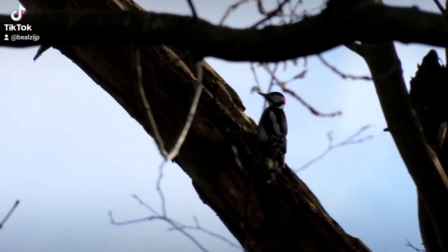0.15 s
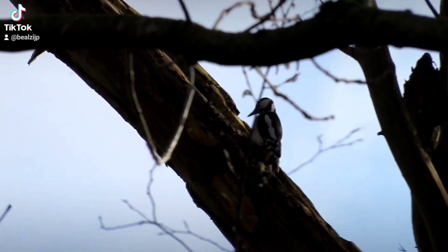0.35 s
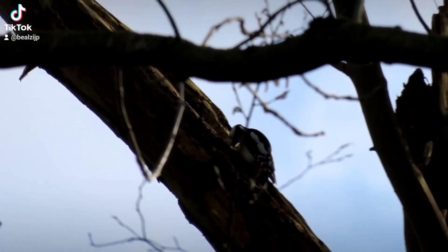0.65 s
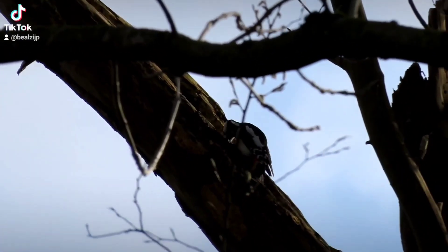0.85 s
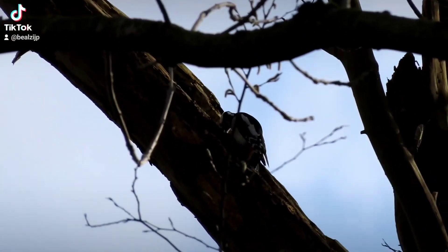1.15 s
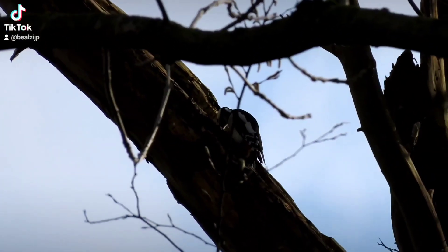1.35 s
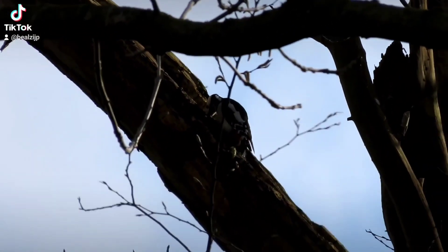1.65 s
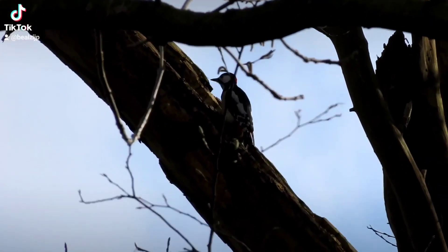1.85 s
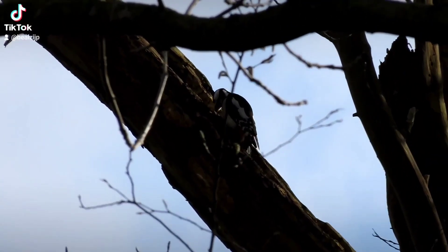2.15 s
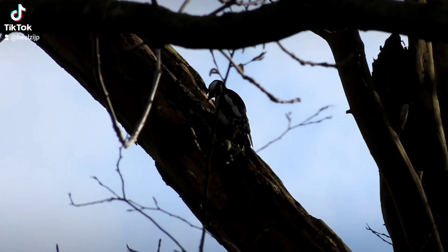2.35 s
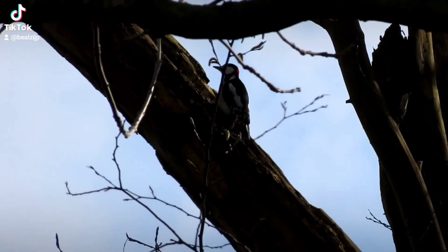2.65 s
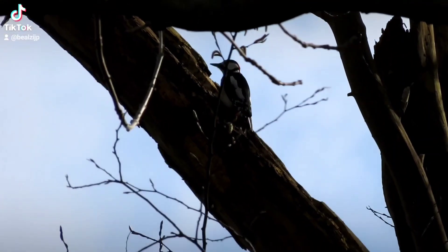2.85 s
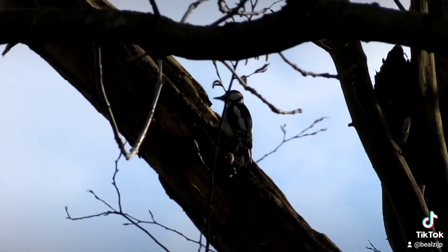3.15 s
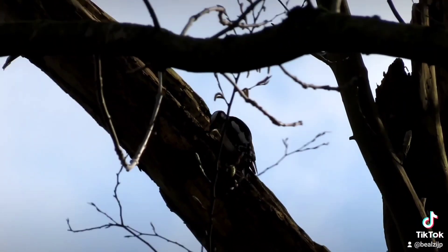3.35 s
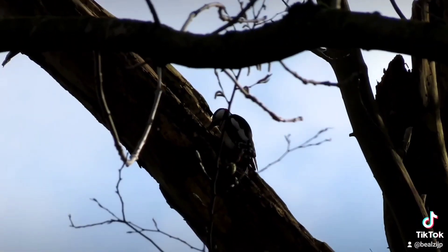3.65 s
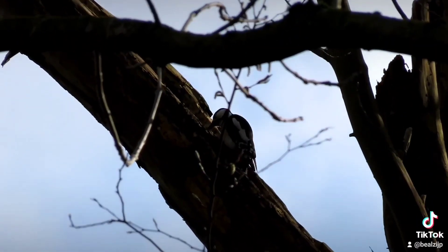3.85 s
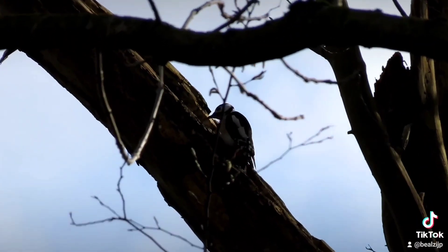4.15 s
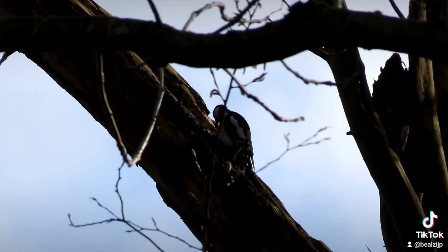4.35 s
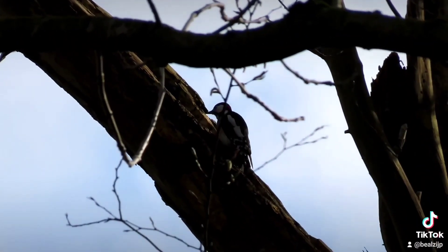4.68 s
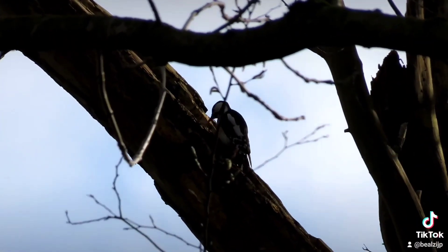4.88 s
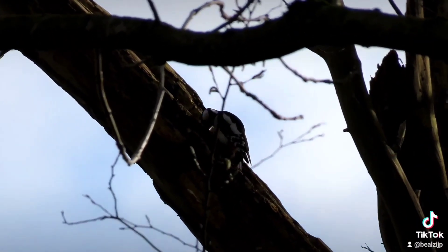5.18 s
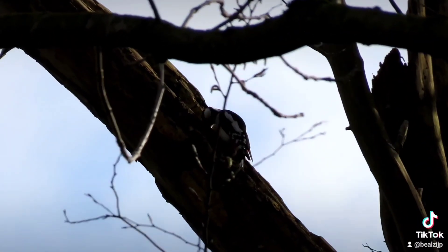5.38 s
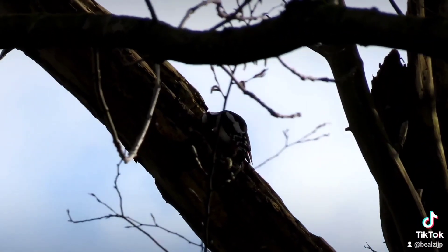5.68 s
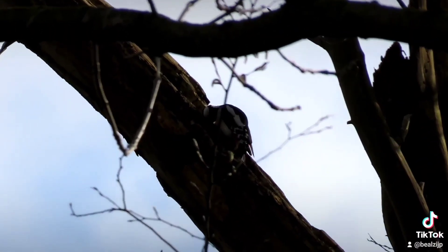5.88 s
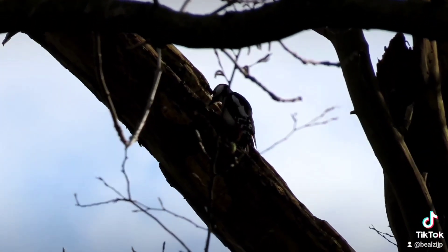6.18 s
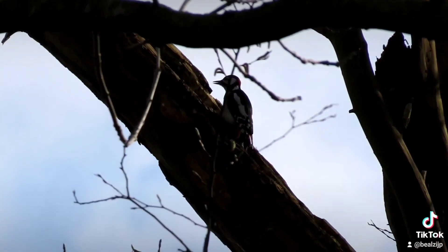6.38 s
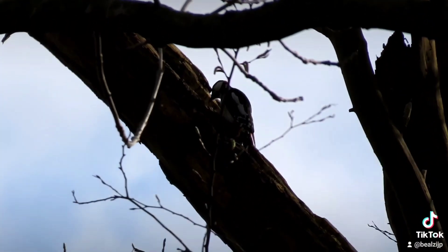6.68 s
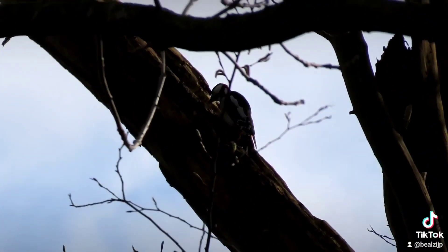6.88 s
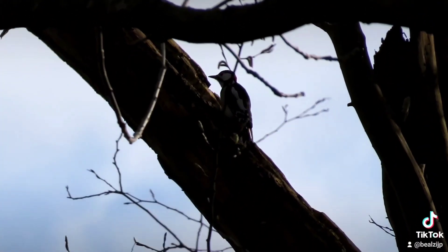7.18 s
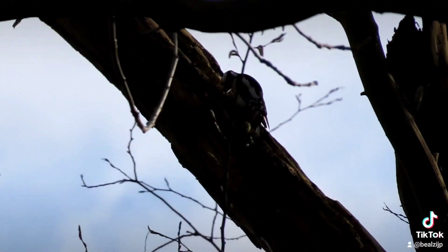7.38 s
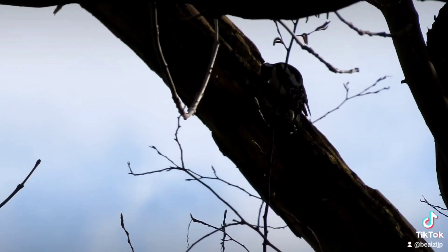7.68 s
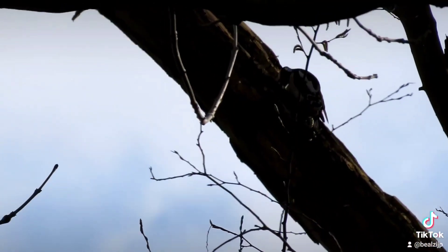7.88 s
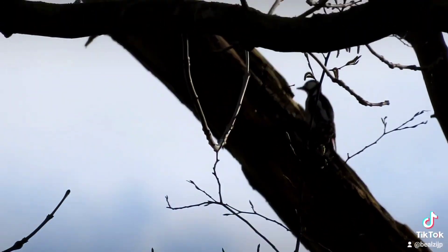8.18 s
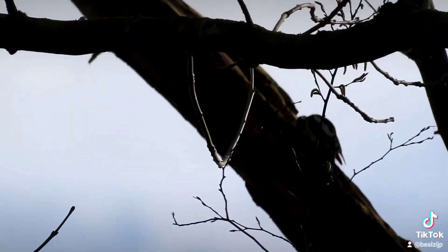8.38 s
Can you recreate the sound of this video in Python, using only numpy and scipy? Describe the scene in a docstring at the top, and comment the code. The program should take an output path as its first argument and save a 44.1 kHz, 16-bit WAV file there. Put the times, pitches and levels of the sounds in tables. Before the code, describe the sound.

Dull far-off drumming, a few light bark taps, then a loud, crisp nearby woodpecker roll, with soft songbird whistles, yelps and crow-like calls around it.

```python
"""A woodpecker close by drums one long, slowing roll on a dead limb: beak cracks over ringing wood modes.
A second one, further off among the trees, drums before and after it with duller, filtered knocks.
Light pecks on bark, gliding songbird whistles, twitter, a far bird's yelps and harsh pulsed crow-like
calls echo between the trunks, over woodland air made of coloured noise and a faint mains hum.
Two microphones, unequal in colour and phase, pick it all up with a little preamp hiss."""
import sys
import numpy as np
from scipy import signal
from scipy.fft import rfft, irfft
from scipy.io import wavfile

SR = 44100
rng = np.random.default_rng(int(sys.argv[2]) if len(sys.argv) > 2 else 0)


def wav_record(signal):
    """Record a signal, one row per channel, as 16-bit PCM in the file named by sys.argv[1]."""
    frames = np.transpose(np.atleast_2d(signal))
    bounded = np.clip(frames, -1, 1)
    # unit amplitude maps onto the largest positive 16-bit level
    quanta = np.round(bounded * 32767).astype(np.int16)
    wavfile.write(sys.argv[1], SR, quanta)


N = 376173
TIME = np.arange(N) / SR

# modes of the dead limb close by: f/Hz, relative level/dB, 60 dB decay t/s
LIMB_MODES = [(66, -37, 0.024), (137, -60, 0.018), (387, -25, 0.0084), (624, -66, 0.044), (743, -26, 0.057),
              (891, -7.5, 0.022), (935, -1, 0.023), (1003, -30, 0.013), (1110, -28, 0.078),
              (1325, -19, 0.045), (1420, -45, 0.065), (1621, -12.5, 0.022), (1637, -18.5, 0.041),
              (1795, -28, 0.043), (1894, -23.5, 0.048), (2227, -22.5, 0.049), (2266, -29.5, 0.038),
              (2316, -29.5, 0.051), (2614, -24.5, 0.04), (2891, -22, 0.04), (3270, -45.5, 0.078),
              (3460, -31.5, 0.037), (3850, -29.5, 0.03), (4110, -29, 0.022)]
# lightly damped modes of the whole trunk, which sing on between blows: f/Hz, relative level/dB, 60 dB decay t/s
TRUNK_MODES = [(556, -55, .45), (607, -51, .45), (673, -47, .5), (720, -51, .4), (763, -51, .4),
               (975, -37, .5), (1015, -42, .3)]
# colour of the crack of the beak on the wood: f/Hz, relative level/dB
CRACK_COLOUR = [(100.0, -34), (500.0, -29), (900.0, -29.5), (1400.0, -1), (1700.0, -9), (2150.0, 2.5),
                (2550.0, -26), (2850.0, -11), (3400.0, -19), (4600.0, -33.5), (5350.0, -23), (5900.0, -36),
                (6400.0, -31.5), (7400.0, -58.5), (10500, -48), (15000.0, -54)]
# the near roll comes in runs with a brief hitch between them: first blow t/s, last blow t/s, first gap t/s
NEAR_RUNS = [(2.4701, 2.578, .0539), (2.6478, 2.818, .056), (2.8805, 3.806, .0575), (3.8893, 3.889, .066)]
# within a run, each gap is this much longer than the one before
ROLL_SLOWING_S = .0006
# the bird works up to full force, and eases off at the very end
WINDUP_DB, WINDUP_S, EASE_DB, EASE_S = -12, .15, -4, 0.063
# offset of the crack against the ring; the first blows land too softly to crack
HARD_DB, SOFT_START_DB, HARDEN_S = 0.54, -11, .06


def near_roll(ring_db=0, crack_db=-9.0, touch_db=-18, spread_s=0.0021, splinter_db=-37, splinter_s=0.0058,
              echo_db=-24, echo_s=0.049, uneven_db=0.97, trunk_db=0):
    """The beak touches, then cracks on the bark; limb modes swell and ring briefly, and the trunk sings on."""
    out, t = np.zeros(N), np.arange(SR // 10) / SR
    hz, db, t60 = np.transpose(LIMB_MODES)[:, :, None]
    sign = (-1) ** np.arange(1, len(LIMB_MODES) + 1)[:, None]  # neighbouring modes swing against each other
    crack = undb(crack_db) * click(CRACK_COLOUR)
    trunk_t = TIME[:SR // 2]
    trunk = np.zeros(len(trunk_t))
    for trunk_hz, gain_db, trunk_t60 in TRUNK_MODES:
        trunk += undb(gain_db) * np.sin(2 * np.pi * trunk_hz * trunk_t) * decay(trunk_t, trunk_t60)

    times = np.concatenate([blows(*run, ROLL_SLOWING_S) for run in NEAR_RUNS])
    since, left = times - times[0], times[-1] - times
    force = WINDUP_DB * np.exp(-since / WINDUP_S) + EASE_DB * np.exp(-left / EASE_S)
    hardness = HARD_DB + SOFT_START_DB * np.exp(-since / HARDEN_S)
    hardness += uneven_db * rng.standard_normal(len(times))
    chances = rng.standard_normal((len(times), 2, len(LIMB_MODES), 1))
    for s, blow_db, hard_db, (size_chance, pitch_chance) in zip(times, force, hardness, chances):
        # the beak never lands on quite the same spot, which the short-waved modes feel most
        size = undb(db + size_chance * hz / 2200)
        pitch = hz * (1 + .003 * pitch_chance)
        modes = sign * size * np.sin(2 * np.pi * pitch * t) * decay(t, t60)
        swell = 1 - np.exp(-t / spread_s)
        add(out, s, undb(blow_db + ring_db) * modes.sum(axis=0) * swell)
        add(out, s, undb(blow_db + trunk_db) * trunk)
        add(out, s, undb(blow_db + hard_db) * crack)
        add(out, s - .0012, undb(blow_db + touch_db) * crack)  # first touch
        # crushed fibres hiss for an instant
        splinter = band(rng.standard_normal(len(t)), 4400, 3400) * np.exp(-t / splinter_s)
        add(out, s, undb(blow_db + hard_db + splinter_db) * splinter)
    # a neighbouring trunk throws back the body of each knock
    add(out, echo_s, undb(echo_db) * band(out, 990, 300))
    return trees(out, wet_db=-21, t60=.65, treble_t60=.36, build_s=.015)


# rolls further off: first blow t/s, last blow t/s, first gap t/s, slowing per blow t/s
DISTANT_RUNS = [(.0336, .834, .0569, .00006), (5.0605, 5.921, .0561, .00019)]
# force of each distant roll: relative level/dB, first blow's offset level/dB, fade level/dB per s
DISTANT_FORCE = [(-34.5, 0.5, 2.5), (-32.5, -10, 3)]
# the distant trunk's colour: f/Hz, relative level/dB
DISTANT_WOOD = [(150, -53), (300, -31), (420, -11.5), (540, -3.5), (680, -7), (850, -6), (1050, -4),
                (1250, 2), (1380, 0.5), (1490, -12.5), (1620, -10.5), (1800, -19), (2400, -21.5),
                (4000, -40.5), (9000, -47)]
# paths from the distant trunk: delay t/s, relative level/dB
DISTANT_PATHS = [(.0008, -2), (.0038, 4), (.0085, -10)]


def far_rolls(gain_db=4, uneven_db=1.0):
    """Dull knocks, slowing and fading a little, that arrive over several paths of uneven strength."""
    out, knock = np.zeros(N), click(DISTANT_WOOD)
    for run, (peak_db, first_db, fade_db) in zip(DISTANT_RUNS, DISTANT_FORCE):
        times = blows(*run)
        force = peak_db - fade_db * (times - times[0])
        force += first_db * (times == times[0])
        chances = rng.standard_normal((len(times), len(DISTANT_PATHS)))
        for s, db, chance in zip(times, force, chances):
            for (delay, path_db), path_chance in zip(DISTANT_PATHS, chance):
                add(out, s + delay, undb(db + path_db + gain_db + uneven_db * path_chance) * knock)
    return trees(out, wet_db=-9.5, t60=.5, treble_t60=.17, build_s=.002)


# light pecks: t/s, peak level/dB of the direct tap
PECK_TIMES = [(.9155, -37), (1.047, -33), (1.2125, -32), (1.3808, -35.5), (1.5222, -33), (1.706, -34)]
# colour of the bark under them: f/Hz, relative level/dB
BARK_COLOUR = [(200, -30), (400, -14), (600, 0), (1200, 0), (1600, -2), (2200, -7), (3200, -13),
               (5000, -28), (10000, -42)]


def pecks(ring_hz=525, ring_t60=0.55, ring_db=-25):
    """Single light taps on bark; a low mode of the wood hums on after each."""
    out, t = np.zeros(N), TIME[:SR // 2]
    tap = click(BARK_COLOUR)
    ring = undb(ring_db) * np.sin(2 * np.pi * ring_hz * t) * decay(t, ring_t60)
    for s, db in PECK_TIMES:
        add(out, s, undb(db) * tap)
        add(out, s, undb(db) * ring)
    return trees(out, wet_db=-4, t60=.6, treble_t60=.3, build_s=.002)


# the clearest whistles from the canopy: t/s, length t/s, start f/Hz, end f/Hz, relative level/dB
CANOPY_WHISTLES = [(.168, .033, 2560, 2630, -54.5), (.276, 0.027, 2870, 3030, -49.5),
                   (.29, 0.027, 2530, 2560, -49), (.425, .035, 2680, 2580, -54),
                   (.483, 0.022, 2870, 2630, -54), (2.43, .053, 2470, 3120, -52.5),
                   (2.527, 0.063, 2600, 3070, -53), (2.595, 0.044, 2300, 2080, -51),
                   (2.96, 0.037, 3040, 2950, -52), (3.01, .035, 2680, 2970, -46),
                   (3.06, 0.059, 2490, 2480, -41), (3.62, .047, 2660, 2410, -51),
                   (3.706, 0.1, 2750, 3160, -45), (3.748, 0.043, 2600, 2300, -51.5),
                   (3.85, 0.043, 2110, 2330, -50), (3.931, 0.071, 2860, 2665, -47),
                   (4.053, 0.035, 3160, 2890, -50), (4.147, 0.037, 3120, 3280, -55),
                   (4.199, 0.066, 3610, 3190, -55.5), (4.292, 0.092, 2360, 3300, -53),
                   (4.427, .068, 3510, 2656, -57), (4.77, 0.092, 3420, 3120, -59.5),
                   (5.058, 0.056, 2820, 3520, -59), (5.422, 0.043, 3060, 2730, -50),
                   (5.53, 0.035, 2740, 2950, -51.5)]
# one long whistle sinks steadily and fades, broken into notes: t/s, length t/s
SINKING_WHISTLE = [(5.988, .17), (6.185, .11), (6.372, 0.04)]
SINKING_HZ, SINK_HZ_PER_S, SINKING_DB, SINKING_FADE_DB_PER_S = 2816, 1430, -49.5, 8


def songbirds(gain_db=2, arch=0.0048):
    """Gliding whistles from the canopy, fluttering a little in pitch and strength."""
    out, notes = np.zeros(N), list(CANOPY_WHISTLES)
    for s, length in SINKING_WHISTLE:
        since = s - SINKING_WHISTLE[0][0]
        start = SINKING_HZ - SINK_HZ_PER_S * since
        end = start - SINK_HZ_PER_S * length
        notes.append((s, length, start, end, SINKING_DB - SINKING_FADE_DB_PER_S * since))
    for s, length, start, end, db in notes:
        middle = (1 + arch) * (start + end) / 2
        phase, swell = syllable(length, start, middle, end, waver=.0005 / length)
        # strength takes a new random value 200 times a second, joined by straight lines
        flutter = np.interp(TIME[:len(swell)], np.arange(50) / 200, rng.standard_normal(50))
        add(out, s, undb(db + gain_db + 2 * flutter) * swell * np.sin(phase))
    return trees(out, wet_db=-5, t60=.55, treble_t60=.55, build_s=.008)


# stretches of twittering: from t/s, to t/s, central f/Hz, loudest chirp's level/dB
TWITTER_STRETCHES = [(.099, 0.603, 3050, -59.5), (2.606, 4.099, 2850, -50.5), (3.15, 4.0, 2400, -61),
                     (4.119, 4.517, 3024, -51.5), (4.603, 5.597, 3190, -57.5), (6.597, 8, 3030, -63)]


def chorus(count=18):
    """Runs of quick, steep chirps from deep in the wood, with strong echo."""
    out = np.zeros(N)
    for begin, finish, pitch_hz, db in TWITTER_STRETCHES:
        for place, length, soft, *bend in rng.random((count, 6)):
            start, middle, end = pitch_hz * (.78 + .44 * np.array(bend))
            phase, swell = syllable(0.0203 + .03 * length, start, middle, end, waver=0.02)
            chirp = undb(db - 6.5 * soft) * swell * np.sin(phase)
            add(out, begin + place * (finish - begin), chirp)
    return trees(out, wet_db=-2.5, t60=.7, treble_t60=1.0, build_s=0.011)


# a far bird's series of soft yelps starts slow and high, then settles
YELP_START_S, YELP_END_S, YELP_GAP_S, YELP_EXTRA_GAP_S, YELP_SETTLE_S = 6.248, 8.52, .1635, .04, .38
YELP_HZ, YELP_EXTRA_HZ, YELP_DB = 1040, 50.2, -56


def yelps(length=0.057, octave_db=-7, second_voice_db=0.5, second_ratio=1.7, second_delay_s=0.009, uneven_db=1.7):
    """Arched notes that quicken to a steady pace; the other side of the syrinx adds a wavering higher tone."""
    out, s = np.zeros(N), YELP_START_S
    while s < YELP_END_S:
        unsettled = np.exp(-(s - YELP_START_S) / YELP_SETTLE_S)
        hz = YELP_HZ + YELP_EXTRA_HZ * unsettled
        db = YELP_DB + uneven_db * rng.standard_normal()
        phase, swell = syllable(length, 0.77 * hz, hz, 0.955 * hz, waver=0.019)
        tone = np.sin(phase) + undb(octave_db) * np.sin(2 * phase)
        add(out, s + 0.013, undb(db) * swell * tone)
        # the higher tone comes in as the series settles
        high = second_ratio * hz * (1 + 0.059 * rng.standard_normal())
        phase, swell = syllable(length, 0.82 * high, 1.04 * high, 0.793 * high, waver=0.063)
        second_voice = undb(db + second_voice_db) * (1 - unsettled) * swell * np.sin(phase)
        add(out, s + second_delay_s, second_voice)
        s += YELP_GAP_S + YELP_EXTRA_GAP_S * unsettled
    return trees(out, wet_db=-5, t60=.6, treble_t60=.6, build_s=.01)


# harsh calls: t/s, length t/s, direct rms level/dB
CAW_CALLS = [(0.272, 0.055, -53), (1.997, 0.061, -50), (2.102, 0.05, -59), (6.658, 0.1, -59.5),
             (6.716, 0.049, -52), (7.599, 0.062, -57), (7.638, 0.053, -48), (7.78, 0.064, -58)]
# the throat's resonances: f/Hz, half the width of each of two passes f/Hz, relative level/dB
THROAT_RESONANCES = [(930, 220, -7), (1550, 380, -5), (2250, 200, -6), (2560, 130, -1), (2920, 130, -2)]


def caws(pitch_hz=380, rasp=0.73):
    """Ragged pulses and rasp through a crow-like throat."""
    out = np.zeros(N)
    for s, length, db in CAW_CALLS:
        phase, swell = syllable(length, .8 * pitch_hz, pitch_hz, .9 * pitch_hz, waver=0.18)
        pulses = np.diff(phase // (2 * np.pi), prepend=0)  # one per cycle
        breath = rasp * (1 + np.cos(phase)) * rng.standard_normal(len(phase))
        source = level(pulses, 0) + breath
        voice = np.zeros(len(phase))
        for hz, width, gain_db in THROAT_RESONANCES:
            voice += undb(gain_db) * band(band(source, hz, 2 * width), hz, 2 * width)
        add(out, s, level(voice * swell, db))
    return trees(out, wet_db=-8, t60=.5, treble_t60=.4, build_s=.008)


# colour of the woodland air: f/Hz, relative level/dB per Hz
AIR_COLOUR = [(20, -0.5), (90, -2.5), (125, 3), (150, -0.5), (180, 9), (240, 1), (320, -3), (800, 1.5),
              (1500, -0.5), (2800, -2.5), (4000, -7.5), (6000, -17), (9000, -22.5), (16000, -33)]
# slow course of the air before its flutter: t/s, level/dB
AIR_COURSE = [(0, -58), (1.3, -57.5), (2.3, -59), (3.2, -53.5), (4.4, -58.5), (4.9, -61.5), (5.5, -55.5),
              (6.5, -58), (7.5, -60), (8.5, -59)]


def air(flutter_db=-1.5):
    """Distant rumble and leaf hiss: coloured noise of fluttering level, partly shared by both sides."""
    noise = rng.standard_normal((3, N))
    flutter = np.interp(TIME, np.linspace(0, TIME[-1], num=70), rng.standard_normal(size=70))
    course_db = np.interp(TIME, *np.transpose(AIR_COURSE)) + flutter_db * flutter
    both_sides = noise[:2] + 0.83 * noise[2]
    return level(colour(both_sides, AIR_COLOUR), 0) * undb(course_db)


def trees(x, wet_db, t60, treble_t60, build_s):
    """Direct sound plus scatter from many trunks, which builds up and dies at separate bass and treble rates."""
    t = np.arange(SR) / SR
    scatter = rng.standard_normal((2, SR))
    scatter = scatter + 0.28 * scatter[::-1]  # the two sides share a little
    low = signal.sosfilt(signal.butter(2, 1500, fs=SR, output="sos"), scatter)
    high = signal.sosfilt(signal.butter(2, 1500, "high", fs=SR, output="sos"), scatter)
    # the minus sign keeps the two bands from cancelling where they cross
    tail = low * decay(t, t60) - high * decay(t, treble_t60)
    tail *= 1 - np.exp(-t / build_s)
    tail /= np.sqrt(np.sum(tail ** 2) / 2)
    return x + undb(wet_db) * signal.fftconvolve(x[None], tail, axes=1)[:, :N]


def blows(first, last, gap, slowing):
    """Times of a run of blows whose gaps lengthen steadily."""
    times = [first]
    while times[-1] + gap / 2 < last:
        times.append(times[-1] + gap)
        gap += slowing
    return np.array(times)


def syllable(length, start_hz, middle_hz, end_hz, waver):
    """Phase and envelope of one gliding, slightly unsteady note."""
    u = np.linspace(0, 1, max(int(length * SR), 2))
    hz = np.polyval(np.polyfit([0, .5, 1], [start_hz, middle_hz, end_hz], 2), u)
    wobble = np.interp(u, np.linspace(0, 1, 20), rng.standard_normal(20))
    phase = 2 * np.pi * np.cumsum(hz * (1 + waver * wobble)) / SR
    return phase, np.sin(np.pi * u)


def undb(db):
    """Decibels to gain."""
    return 10 ** (np.asarray(db) / 20)


def decay(t, t60):
    """Exponential decay that falls by 60 dB in t60 seconds."""
    return np.exp(-np.log(1000) * t / t60)


def level(x, db):
    """Scale to an rms level."""
    return x * undb(db) / np.sqrt(np.mean(x ** 2))


def curve_at(points, hz):
    """Read a spectrum on a log-frequency axis."""
    f, value = np.transpose(points)
    return np.interp(np.log(hz + 1), np.log(f), value)


def colour(x, points):
    """Filter a signal by a spectrum."""
    n = x.shape[-1]
    return irfft(rfft(x) * undb(curve_at(points, np.fft.rfftfreq(n, 1 / SR))), n)


def click(points, size=2048):
    """The shortest causal (minimum-phase) pulse with this spectrum, peak 1."""
    cepstrum = irfft(np.log(undb(curve_at(points, np.fft.rfftfreq(size, 1 / SR)))))
    # folding the cepstrum onto positive time makes the pulse causal
    cepstrum[1:size // 2] *= 2
    cepstrum[size // 2 + 1:] = 0
    pulse = irfft(np.exp(rfft(cepstrum)))
    return pulse / np.abs(pulse).max()


def add(out, s, x):
    """Mix a sound in at a time in seconds."""
    i = min(max(int(round(s * SR)), 0), len(out))
    out[i:i + len(x)] += x[:len(out) - i]


def band(x, hz, width):
    """One resonance, its width in Hz."""
    return signal.lfilter(*signal.iirpeak(hz, hz / width, fs=SR), x)


def scene():
    """Everything that sounds in the wood, from the near limb to the air."""
    birds = songbirds() + chorus() + yelps() + caws()
    return near_roll() + far_rolls() + pecks() + birds + air()


# left minus right level of the two microphones: f/Hz, level/dB
MICROPHONE_BALANCE = [(60, 0), (130, 4.5), (200, -1.5), (380, -11), (700, -11), (950, -5), (1400, -0.5),
                      (2200, 5.5), (2900, 10), (4400, 20.5), (6000, 17.5), (8500, 10.5), (15000, 3)]
# the hum swells and fades, as heard on the left: t/s, rms level/dB
HUM_COURSE = [(0, -55), (.6, -57.5), (1.1, -58), (1.7, -56.5), (2.3, -60), (3, -56), (4.1, -56),
              (4.8, -62.5), (5.2, -56.5), (5.7, -58.5), (6.3, -56), (6.8, -57.5), (7.3, -63), (7.7, -57),
              (8.5, -62)]
TOP_HZ = 15550


def record(dry, turn=1.37, lag_s=.00003, hum_right_db=-20, hiss_db=-69.0):
    """Unequal microphones, the left one lagging; mains hum, preamp hiss and a steep top cut."""
    hz = np.fft.rfftfreq(N, 1 / SR)
    ratio = undb(curve_at(MICROPHONE_BALANCE, hz))
    # phase lag in radians: a turn that sets in around 350 Hz, plus a fixed delay
    lag = turn * hz ** 2 / (hz ** 2 + 350 ** 2) + 2 * np.pi * hz * lag_s
    microphones = np.array([ratio * np.exp(-1j * lag), np.ones(len(hz))])
    even_power = np.sqrt(2 / (1 + ratio ** 2))  # the two gains keep a mean power of 1
    sound = irfft(rfft(dry) * microphones * even_power, N)
    mains = np.sin(2 * np.pi * 59.7 * TIME)
    hum_course = undb(np.interp(TIME, *np.transpose(HUM_COURSE)))
    hum = level(mains, 0) * hum_course * undb([[0], [hum_right_db]])
    hiss = undb(hiss_db) * rng.standard_normal((2, N))
    top_cut = signal.ellip(10, .2, 60, TOP_HZ, fs=SR, output="sos")
    return signal.sosfilt(top_cut, sound + hum + hiss)


dry = scene()
out = record(dry)
wav_record(out)
```